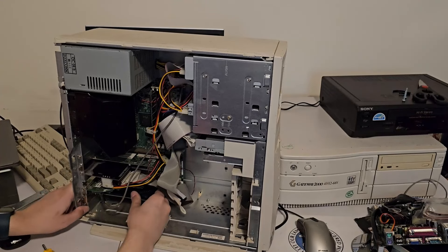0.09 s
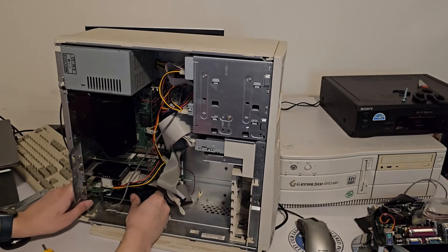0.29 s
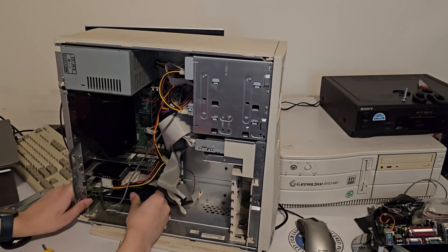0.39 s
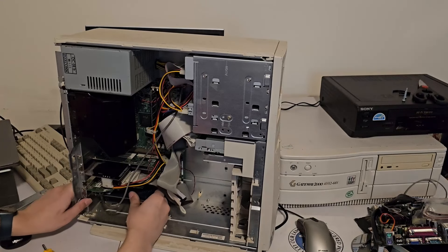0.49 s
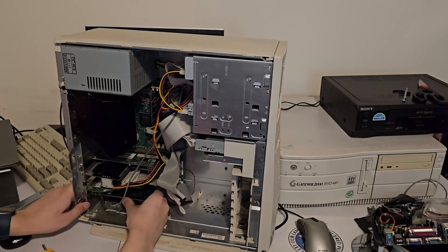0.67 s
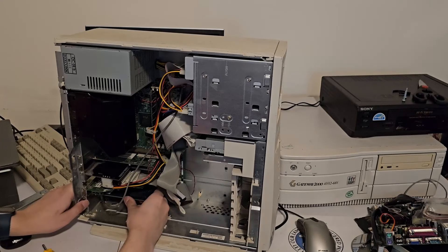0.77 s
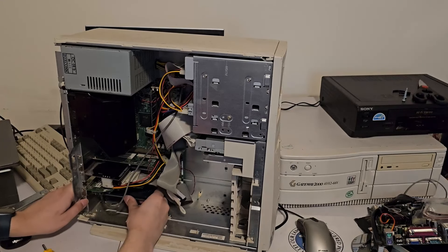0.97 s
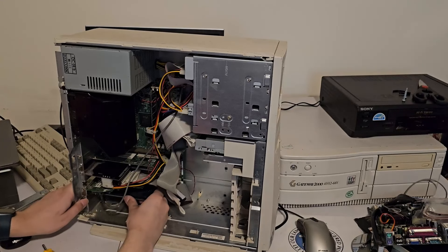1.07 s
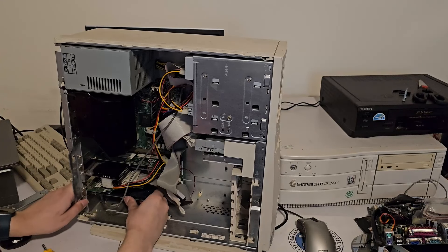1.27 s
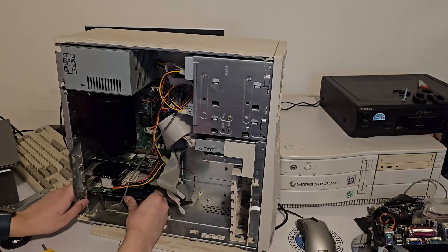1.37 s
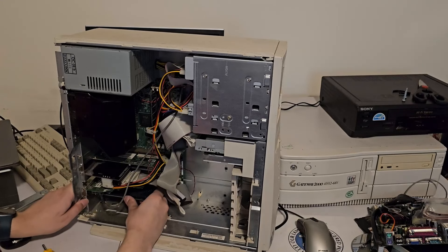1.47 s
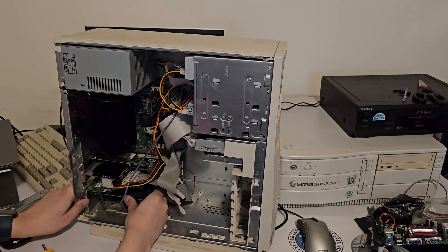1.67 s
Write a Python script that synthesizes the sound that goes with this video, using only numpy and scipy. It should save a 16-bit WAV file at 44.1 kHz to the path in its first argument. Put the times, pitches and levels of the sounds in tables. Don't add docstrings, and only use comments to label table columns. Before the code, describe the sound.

After a barely audible rub, one hard metallic snap rings briefly and thumps the thin case panels; tiny rubbing sounds follow, then a soft skidding tick, over low room rumble, heard closely, brighter on the left.

```python
import sys
import numpy as np
from scipy import signal
from scipy.fft import rfft, irfft
from scipy.io import wavfile
from scipy.ndimage import uniform_filter1d

SR = 44100
rng = np.random.default_rng(int(sys.argv[2]) if len(sys.argv) > 2 else 0)


def to_wav(s):
    ch = np.atleast_2d(s).T
    pcm = np.round(np.clip(ch, -1, 1) * 32767)
    wavfile.write(sys.argv[1], SR, pcm.astype(np.int16))


def volts(x):
    e = np.asarray(x, float) / 20
    return 10 ** e


N = 74970

# (start_s, peak_db, build_up_s, die_away_s)
SNAP_RUNS = [
    (.186, -52.5, 0.028, 0.0026),
    (.2122, -28, 0.0005, 0.0032),
    (.2150, -16.5, 0.0027, 0.004),
    (.2215, -26, 0.00083, 0.0036),
    (.2315, -29, 0.00033, 0.0017),
]
# (pitch_hz, level_db, t60_s)
BRACKET_MODES = [(1643, -9.5, 0.12), (2197, -11, 0.035), (2731, -8, .1), (3700, 0.5, 0.17),
                 (4139, -5.5, .1), (4990, -7, .08), (5046, -3, 0.049), (5500, -3.5, .05),
                 (5870, -9.5, 0.027), (7284, -6, 0.073), (7880, -8.5, 0.19), (9300, -17.5, 0.11)]
# (pitch_hz, level_db)
CRACK_COLOUR = [(150, -24), (600, -5), (1500, -7), (3000, -5), (5300, -8), (7800, -13), (10300, -22),
                (15500, -15.5)]


def snap():
    bracket_db, crack_db = -14, 1
    response = volts(bracket_db) * ring(BRACKET_MODES, swell_s=0.0006)
    add(response, 0, volts(crack_db) * colour(CRACK_COLOUR))
    return signal.fftconvolve(contact(SNAP_RUNS), response)[:N]


# (start_s, level_db)
PANEL_PUSHES = [
    (0.2123, -34),
    (0.2187, -24.5),
]
# (pitch_hz, level_db, t60_s)
FRAME_MODES = [(495.7, 0.5, 0.11), (540, 0, 0.088), (601.8, -2, 0.089), (671.6, 1, 0.1), (754, -1, 0.12),
               (781, -13, .22), (841.5, -1, 0.16), (917, -3.5, .11), (988.3, 4, 0.073), (1080, -5.5, .1),
               (1181.6, -11.5, 0.071), (1298, 6.5, 0.051), (1394, -5, .16), (1515, -12, 0.27)]
# (pitch_hz, level_db, t60_s)
SIDE_MODES = [(112, -15.5, 0.27), (165, -11.5, .15), (190, -5, 0.39), (215, -5, 0.22), (255, -5, 0.45),
              (300.1, -10, 0.21), (369.5, -3.5, 0.48), (366, -9, 0.11)]


def panels():
    sides_db = -7.5
    boom = ring(FRAME_MODES, swell_s=0.0032)
    boom = boom + volts(sides_db) * ring(SIDE_MODES, swell_s=0.0083)
    out = np.zeros(N)
    for start_s, level_db in PANEL_PUSHES:
        add(out, start_s, 20 * volts(level_db) * boom)
    return out


# (start_s, peak_db, build_up_s, die_away_s)
TICK_RUNS = [
    (1.5862, -46, 0.00097, 0.0083),
    (1.594, -53, 0.00048, .014),
    (1.641, -83, 0.0015, 0.005),
]
# (pitch_hz, level_db)
TICK_COLOUR = [(150, -38.5), (250, -20), (674, -7), (802, 1), (955, -5), (1950, -3.5), (2860, -12.5),
               (4730, -13.5), (16000, -35)]


def tick():
    return signal.fftconvolve(contact(TICK_RUNS), colour(TICK_COLOUR))[:N]


# (start_s, level_db, length_s, centre_hz, sharpness)
SCUFFS_AND_CREAKS = [(.001, -69, 0.026, 870, 0.34), (.002, -88.5, 0.02, 4440, 0.95),
                     (0.397, -64.5, 0.034, 792, 1.15), (.438, -61.5, 0.032, 1210, 0.42),
                     (.439, -80, 0.093, 8000, 0.34), (0.469, -63.5, 0.035, 620, 0.52),
                     (0.511, -69, 0.016, 966, 3.1), (0.553, -75.5, 0.064, 8400, 0.65),
                     (0.561, -68, 0.033, 2130, 1), (0.562, -67, 0.033, 743, 13.6),
                     (.660, -75.5, 0.042, 800, 1.22), (0.748, -68, 0.043, 740.7, 0.79),
                     (0.866, -78, .04, 4900, 1.8), (0.873, -68.5, 0.043, 1390, 4.2),
                     (0.874, -70, 0.059, 766, 0.95), (.972, -69, 0.043, 2786, 0.51),
                     (.973, -74.5, 0.042, 6820, 14), (.974, -78, .035, 4460, 4.9),
                     (.975, -83.5, 0.018, 8700, 5.8), (1.106, -71, 0.031, 766, 2.83),
                     (1.149, -61.5, 0.017, 1600, 10), (1.148, -65, 0.03, 606, 0.46),
                     (1.149, -68.5, 0.011, 4350, 2.2), (1.490, -80.5, 0.0212, 830, 1.47)]
# (start_s, level_db, length_s, centre_hz, sharpness)
TICK_RATTLES = [
    (1.585, -51.5, 0.018, 3370, 4.6),
    (1.587, -54.5, 0.011, 4290, 12.7),
    (1.637, -64.5, 0.01575, 1262, 1.6),
    (1.669, -65.5, 0.047, 800, 1.17),
]


def scuffs():
    rasp_per_s, metal_ring_db, stroke_skew = 5500, -11, 0.55
    warm_up = 2000
    grains = clicks(rasp_per_s)
    metal = ring(FRAME_MODES + BRACKET_MODES, swell_s=0.0013)
    grains = grains + volts(metal_ring_db) * signal.fftconvolve(grains, metal)[:N]
    out = np.zeros(N)
    for start_s, level_db, length_s, centre_hz, sharpness in SCUFFS_AND_CREAKS + TICK_RATTLES:
        at = max(round(start_s * SR), 0)
        progress = np.arange(0, length_s, 1 / SR) / length_s
        b, a = signal.iirpeak(centre_hz, max(sharpness, centre_hz / 15000), SR)
        tone = grains[max(at - warm_up, 0):at + len(progress)]
        for _ in range(2):
            tone = signal.lfilter(b, a, tone)
        tone = evened(tone[-len(progress):])
        stroke = np.sin(np.pi * progress ** stroke_skew) ** 1.79
        add(out, start_s, volts(level_db) * stroke * tone)
    return out


# (start_s, level_db, pitch_hz, t60_s, rise_s)
CASE_ROCKS = [
    (0.212, -44.5, 62, .2, 0.0087),
    (0.273, -46.5, 42.5, 0.52, 0.028),
    (0.44, -49, 236.3, 0.16, 0.02),
    (0.475, -54.5, 233.2, 0.22, 0.0086),
    (1.19, -56.5, 227.7, 0.14, 0.012),
    (1.588, -60, 58.8, 0.32, 0.014),
]


def rocking():
    out, t = np.zeros(N), np.arange(SR // 2) / SR
    for start_s, level_db, pitch_hz, t60_s, rise_s in CASE_ROCKS:
        envelope = volts(level_db - 60 * t / t60_s) * np.minimum(t / rise_s, 1)
        add(out, start_s, envelope * np.sin(2 * np.pi * pitch_hz * t))
    return out


# (pitch_hz, t60_s)
ROOM_DECAY = [(150, 0.65), (500, 0.3), (2000, .24), (6000, 0.24), (9000, 0.25), (12000, .2), (16000, 0.14)]
# (pitch_hz, share from 0 to 1)
ROOM_UNLIKE = [(150, .05), (500, .2), (1500, .9), (15000, 0.4)]


def room(x):
    spacing = 12
    taps = np.zeros((3, SR // 2))
    slots = np.arange(100, SR // 2 - 20, spacing)
    at = slots + rng.integers(0, spacing, (3, len(slots)))
    np.put_along_axis(taps, at, rng.choice([-1., 1.], (3, len(slots))), 1)
    hz, t, bands = signal.stft(taps, SR, nperseg=256)
    unlike = np.clip(read(ROOM_UNLIKE, hz), 0, 1)[:, None]
    bands = np.sqrt(unlike) * bands[:2] + np.sqrt(1 - unlike) * bands[2]
    decay = volts(-60 * t / read(ROOM_DECAY, hz)[:, None])
    tail = signal.istft(bands * decay, SR, nperseg=256)[1]
    return signal.fftconvolve(x[None], tail / np.linalg.norm(tail[0]), axes=1)[:, :N]


# (pitch_hz, level_db)
LEFT_OVER_RIGHT = [(200, -1.3), (2000, 5.35), (5000, 5.67), (9000, 15), (13000, 12)]


def ports(x):
    right_late_s = 0.00018
    hz = np.fft.rfftfreq(2 * N, 1 / SR)
    lean = volts(read(LEFT_OVER_RIGHT, hz) / 2)
    right = np.exp(-2j * np.pi * hz * right_late_s) / lean
    return irfft(rfft(x, 2 * N) * np.array([lean, right]))[:, :N]


# (pitch_hz, level_db)
HUSH_COLOUR = [(20, -3.5), (50, -9.5), (120, -14), (230, -20), (330, -27.5), (5200, -41.5), (6300, -50.5),
               (16000, -57.5)]
# (pitch_hz, likeness)
HUSH_LIKENESS = [(60, 1), (130, 0.37), (300, .4), (700, 0.21), (15000, 0.044)]


def hush():
    level_db, left_over_right_db, lump_db = -64.5, 4.5, 1.2
    frames, hz = N // 512 + 5, np.fft.rfftfreq(2048, 1 / SR)
    a, b, c, d, patches = rng.standard_normal((frames, 1025, 5)).T
    patches = uniform_filter1d(patches, size=20, axis=0)
    patches = evened(uniform_filter1d(patches, size=5, axis=1))
    same = np.clip(read(HUSH_LIKENESS, hz), -1, 1)[:, None]
    left = a + 1j * b
    right = same * left + np.sqrt(1 - same ** 2) * (c + 1j * d)
    bands = np.array([left, right]) * volts(read(HUSH_COLOUR, hz)[:, None] + lump_db * patches)
    noise = signal.istft(bands, nperseg=2048, noverlap=1536)[1][:, :N]
    balance = volts(np.array([[left_over_right_db / 2], [-left_over_right_db / 2]]))
    return volts(level_db) * evened(noise) * balance


def contact(runs):
    force, t = np.zeros(N), np.arange(SR // 8) / SR
    for start_s, peak_db, rise_s, fall_s in runs:
        build_up = np.minimum(t / rise_s, 1) ** 2
        die_away = np.exp(-np.maximum(t - rise_s, 0) / fall_s)
        add(force, start_s, volts(peak_db) * build_up * die_away)
    return force * clicks(per_s=14000)


def clicks(per_s):
    spread_db = 2
    size = volts(spread_db * np.minimum(rng.exponential(1, N), 3))
    size = size * rng.choice([-1., 1.], N)
    return evened(size * (rng.random(N) < per_s / SR))


def ring(modes, swell_s):
    t = np.arange(SR // 2) / SR
    body = np.zeros(len(t))
    for pitch_hz, level_db, t60_s in modes:
        body += volts(level_db - 60 * t / t60_s) * np.sin(2 * np.pi * (pitch_hz * t + rng.random()))
    body = body * (1 - np.exp(-t / swell_s))
    return body / np.linalg.norm(body)


def colour(points):
    log_gain = np.log(volts(read(points, abs(np.fft.fftfreq(4096, 1 / SR)))))
    phase = signal.hilbert(log_gain).imag
    taps = np.fft.ifft(np.exp(log_gain - 1j * phase)).real[:2048]
    return taps / np.linalg.norm(taps)


def evened(x):
    return x / np.sqrt(np.mean(x ** 2) + 1e-20)


def read(points, hz):
    table_hz, value = np.transpose(points)
    return np.interp(np.log(hz + 1), np.log(table_hz + 1), value)


def add(mix, start_s, sound):
    part = mix[max(round(start_s * SR), 0):][:len(sound)]
    part += sound[:len(part)]


def scene():
    room_db, panels_in_room_db = -5.5, -10.5
    case = snap() + tick() + scuffs()
    boom = panels()
    direct = ports(case + boom)
    reflected = volts(room_db) * room(case + volts(panels_in_room_db) * boom)
    return direct + reflected + rocking() + hush()


def top_cut(x):
    return signal.sosfilt(signal.butter(12, 16980, fs=SR, output="sos"), x)


def record(dry):
    knee = volts(-5)
    limited = knee * np.tanh(dry / knee)
    edge = signal.firwin(255, 16300, fs=SR)
    mix = signal.oaconvolve(limited, edge[None], "same")
    return top_cut(mix)


dry = scene()
out = record(dry)
to_wav(out)
```